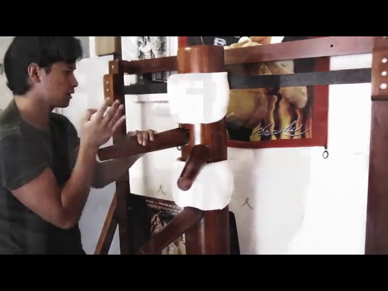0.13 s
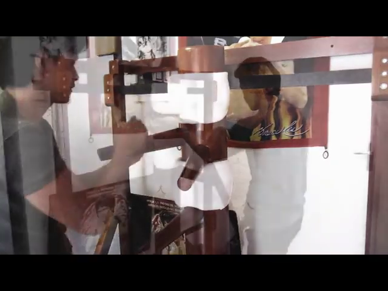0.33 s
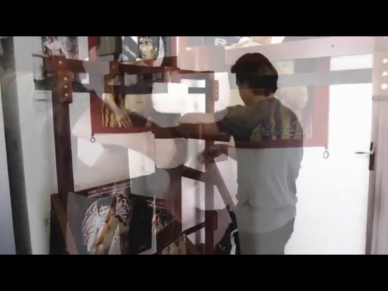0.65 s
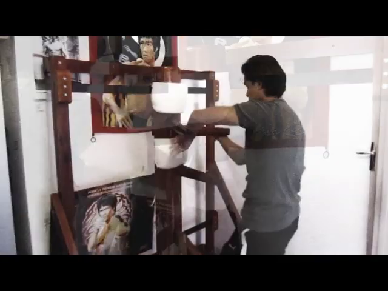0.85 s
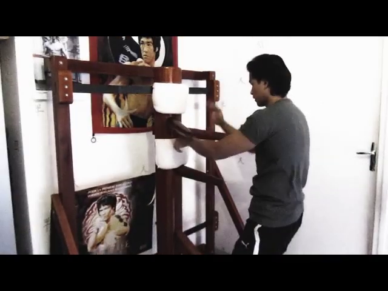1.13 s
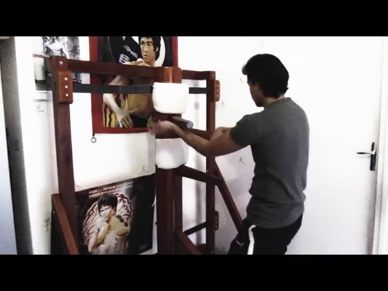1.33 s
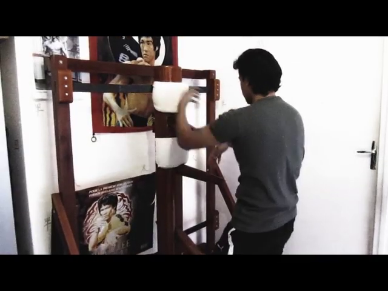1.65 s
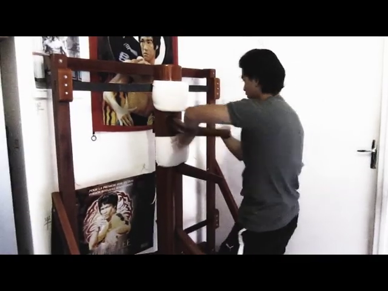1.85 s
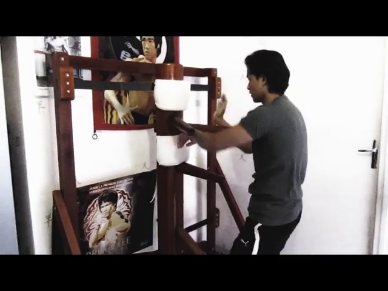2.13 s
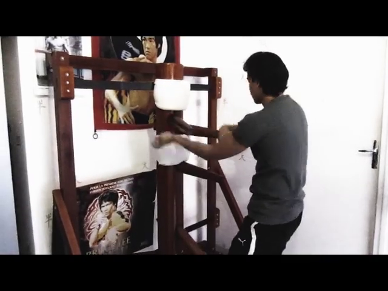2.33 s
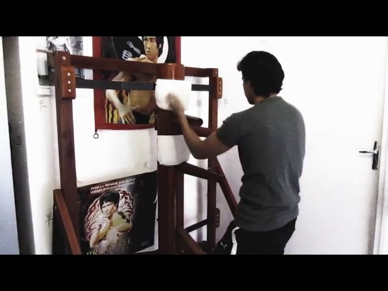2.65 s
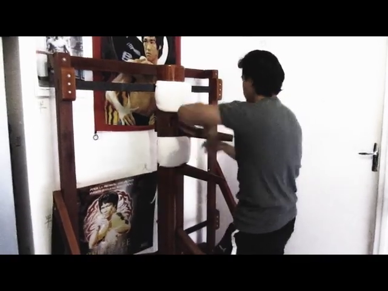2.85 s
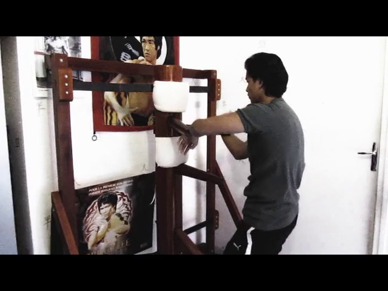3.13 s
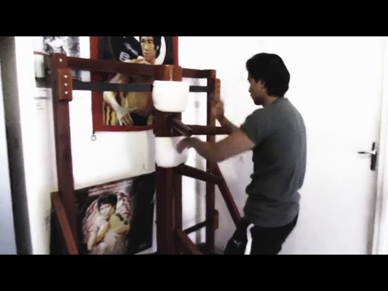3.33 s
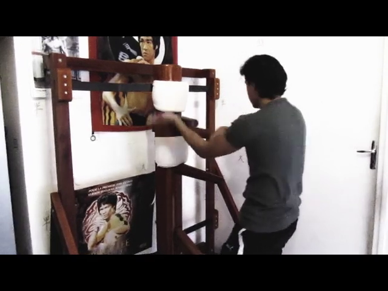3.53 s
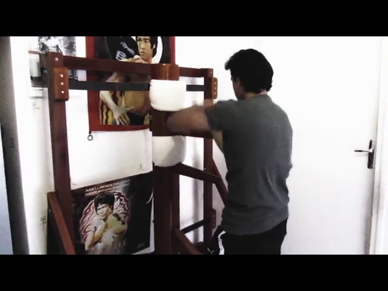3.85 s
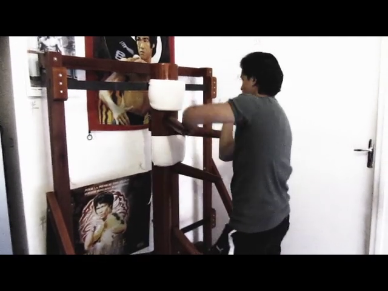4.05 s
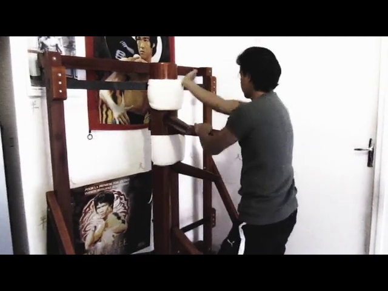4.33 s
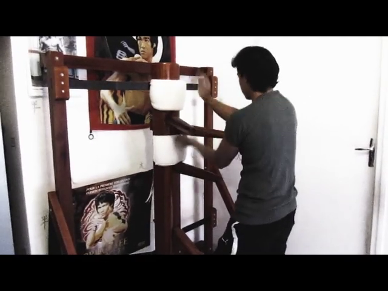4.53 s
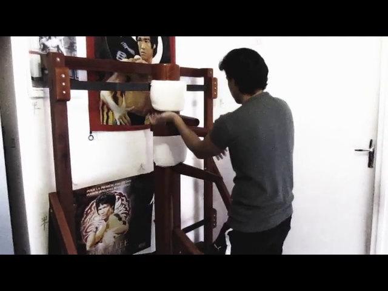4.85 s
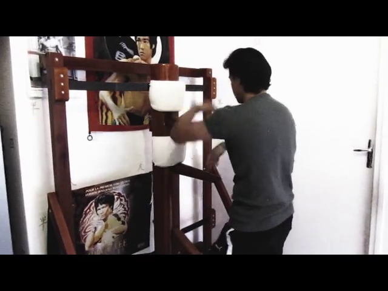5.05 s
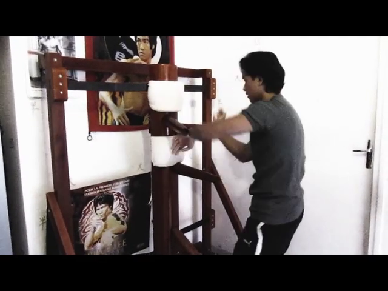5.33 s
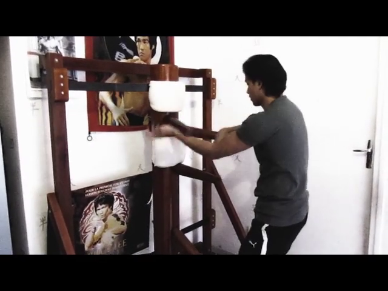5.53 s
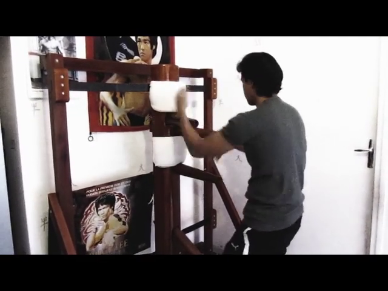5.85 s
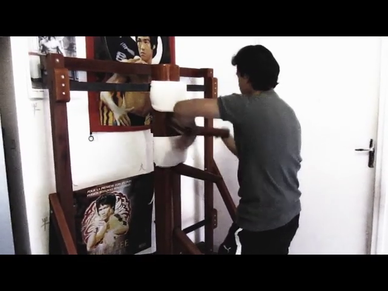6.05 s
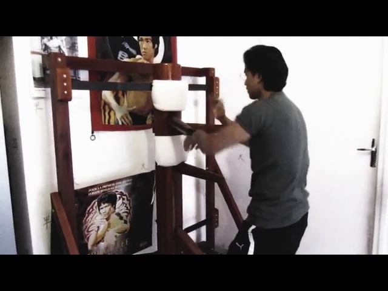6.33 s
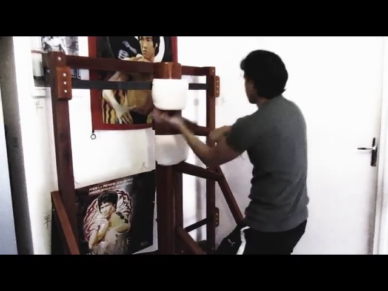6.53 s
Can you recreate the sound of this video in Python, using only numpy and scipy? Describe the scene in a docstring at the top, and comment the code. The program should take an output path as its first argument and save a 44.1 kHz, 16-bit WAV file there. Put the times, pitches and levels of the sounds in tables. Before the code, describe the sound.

Irregular bursts of hollow wooden knocks and dull thuds, with skin slaps and soft foot scuffs, in a small bare room.

```python
"""Irregular woody knocks with dull thuds, clacks and short rings sound in a small, bare room.
Someone drills on a wooden training dummy: each blow drives a loose arm against its socket, exciting
frame, trunk and arm as resonators. Skin slaps and slides on the wood, fingertips tick and feet shift.
Each contact is noise under a force envelope, coloured by a filter and followed by the room's decay.
Still air and a faint low drone, which swells twice, lie behind."""
import sys
import numpy as np
from scipy import signal
from scipy.fft import rfft, irfft
from scipy.io import wavfile

SR = 44100
rng = np.random.default_rng(int(sys.argv[2]) if len(sys.argv) > 2 else 0)


def put_to_file(sound):
    """Save the sound as 16-bit audio at rate SR, in the file named by the first command-line argument."""
    columns = np.atleast_2d(sound).T  # one column per channel
    safe = np.clip(columns, -1, 1)
    whole_steps = np.round(safe * 32767)
    wavfile.write(sys.argv[1], SR, whole_steps.astype(np.int16))


N = 295470
SIZE, LEAD = 32768, 1024  # samples in one short sound, and before its main contact
AGE = (np.arange(SIZE) - LEAD) / SR  # seconds since the main contact
FREQS = np.maximum(np.arange(SIZE // 2 + 1) * SR / SIZE, 1)  # Hz


def undb(db):
    """Level: an amplitude gain is ten to the power of decibels over twenty."""
    return 10 ** (np.asarray(db) / 20)


def curve(points, freqs=FREQS):
    """Spectral envelope: gain joined through (Hz, dB) points on a logarithmic frequency axis."""
    hz, db = np.transpose(points)
    return undb(np.interp(np.log(freqs), np.log(hz), db))


def bell(hz, octaves, height_db):
    """Formant: a Gaussian emphasis in octaves around one frequency."""
    distance = np.log2(FREQS / hz) / octaves
    return undb(height_db * np.exp(-.5 * distance ** 2))


def below(hz, order=8):
    """Low-pass: the steep Butterworth magnitude response."""
    return 1 / np.sqrt(1 + (FREQS / hz) ** (2 * order))


def shape(x, gain):
    """Minimum phase: folding the cepstrum makes a causal filter from a gain curve."""
    cepstrum = irfft(np.log(gain / gain.max() + 1e-4))
    cepstrum[1:SIZE // 2] *= 2
    cepstrum[SIZE // 2 + 1:] = 0
    response = np.exp(rfft(cepstrum))
    return gain.max() * irfft(rfft(x) * response)


def voiced(x, parts):
    """Energy summation of (gain, dB) parts; each level is that part's energy spread over 50 ms."""
    power = np.mean(np.abs(rfft(x)) ** 2, axis=0) * 2 / SIZE / (SR / 20)
    total = 0
    for gain, db in parts:
        total = total + (gain * undb(db)) ** 2 / (power @ gain ** 2)
    return shape(x, np.sqrt(total))


def add(out, s, x):
    """Superposition: a short sound joins the mix with its main contact at time s."""
    start = int(s * SR) - LEAD
    first, last = max(start, 0), min(start + SIZE, N)
    out[:, first:last] += x[:, first - start:last - start]


# Reverberation of the room, band by band. Each row: band centre in Hz, decay time by 60 dB in
# seconds, side level relative to mid in dB.
ROOM_BANDS = [(60, 0.68, 2.5), (154, 0.91, -10.5), (406, 0.6, -14.5), (1010, 0.49, -17), (2060, 0.46, -12),
              (4300, 0.42, -7.5), (8440, 0.4, -4.5), (13200, 0.36, 9.5)]


def diffuse_field():
    """Diffuse field: band noise at two microphones, least alike in the treble and then the deep bass."""
    hz, _, side_db = np.transpose(ROOM_BANDS)
    noise = rfft(rng.standard_normal((2, N)))
    octave = np.log2(np.linspace(1, SR / 2, N // 2 + 1))
    field = []
    for row, side_gain in zip(np.eye(len(hz)), undb(side_db)):
        # each band fades linearly in octaves into its neighbours
        mid, side = irfft(noise * np.interp(octave, np.log2(hz), row), N)
        field.append((mid + side_gain * np.outer([1, -1], side)) / np.hypot(1, side_gain))
    return np.array(field)


def in_room(force, direct_db, field):
    """Energy decay: noise follows the force, and its energy dies away exponentially in each band."""
    force = force / np.linalg.norm(force)
    start = rng.integers(N - SIZE)
    sound = undb(direct_db) * force * rng.standard_normal(SIZE)
    for band, (_, t60, _) in zip(field, ROOM_BANDS):
        keep = np.exp(-2 * np.log(1000) / (t60 * SR))  # energy kept per sample
        energy = signal.lfilter([1 - keep], [1, -keep], force ** 2)
        sound = sound + band[:, start:start + SIZE] * np.sqrt(energy)
    return sound


def reflected(x, gain=0.22, latest_s=.02, count=4):
    """Early reflection: nearby wall, door and frame return a few distinct delayed copies."""
    out = x
    for lag in rng.uniform(0.0989, 1, count) * latest_s:
        out = out + gain * np.roll(x, int(lag * SR), axis=1)
    return out


def contact(rise_s, fall_s, brush_db, brush_s=0.0053):
    """Contact force: a full push rises and decays, with a light brush just before and after its onset."""
    after = np.clip(AGE, 0, 40 * fall_s)
    push = (1 - np.exp(-after / rise_s)) * np.exp(-after / fall_s)
    return push + undb(brush_db) * np.exp(-np.abs(AGE) / brush_s)


# Spectrum of still air. Each row: frequency in Hz, relative density in dB per Hz.
AIR_COLOUR = [(25, -24), (60, -5.5), (90, -5), (220, 2.5), (450, -8.5), (1000, -8.5), (1600, -15),
              (2800, -18.5), (4000, -30), (6000, -24), (10000, -32.5), (13000, -58)]
AIR_DB = -56
# Swells of the low drone. Each row: start in seconds, end in seconds.
DRONE_SWELLS = [(.7, 1.7), (4.2, 5.8)]
DRONE_DB, DRONE_REST_DB, DRONE_FADE_S = -67.5, -80, 0.23  # swollen, resting, rise or fall time


def background(field):
    """Stationary noise: filtered room air, with a narrow-band drone near 58 Hz that swells and fades."""
    freqs, t = np.linspace(1, SR / 2, N // 2 + 1), np.arange(N) / SR
    reversed_field = field.sum(axis=0)[:, ::-1]  # runs apart from the reverberation
    air = irfft(rfft(reversed_field) * curve(AIR_COLOUR, freqs), N)
    drone_gain = curve([(46, -70), (56, -3), (58, 0), (60, -3), (72, -90)], freqs)
    drone = irfft(rfft(rng.standard_normal(N)) * drone_gain, N)
    swell = 0
    for start, end in DRONE_SWELLS:
        swell = swell + np.clip(np.minimum(t - start, end - t) / DRONE_FADE_S, 0, 1)
    drone_db = DRONE_REST_DB + (DRONE_DB - DRONE_REST_DB) * swell
    return undb(AIR_DB) * air / air.std() + undb(drone_db) * drone / drone.std()


def uneven(spread_db):
    """Stick-slip: friction strength jumps at random every 256 samples (6 ms)."""
    return undb(spread_db * np.repeat(rng.standard_normal(SIZE // 256), 256))


# Spectrum of a shoe sole on the floor. Each row: frequency in Hz, gain in dB.
SOLE_COLOUR = [(40, -34), (110, -4.5), (160, 9), (500, 6.5), (1000, 0.5), (2000, -15), (4000, -32.5),
               (9000, -47)]
# Feet and body shifting. Each row: start in seconds, level in dB, centre in Hz.
STEPS = [(.66, -35.5, 540), (1.059, -40, 433), (2.244, -43, 350), (2.499, -36.5, 540), (2.659, -42.5, 430),
         (3.409, -43, 517), (4.222, -43, 473), (4.352, -36.5, 570), (4.455, -38, 315), (5.407, -34, 350),
         (5.721, -37, 565), (6.295, -26.5, 400)]


def step(field, db, hz):
    """Stick-slip friction: a sole grips and slips unevenly in a soft, dull scuff."""
    force = uneven(4) * contact(rise_s=0.011, fall_s=0.03, brush_db=-8.5)
    burst = reflected(in_room(force, -2.4, field))
    colour = curve(SOLE_COLOUR) * bell(hz, octaves=1.0, height_db=5.0)
    colour = colour * bell(237, octaves=0.14, height_db=3.5)
    return voiced(burst, [(colour, db)])


# Spectrum of hands and sleeves rubbing. Each row: frequency in Hz, gain in dB.
CLOTH_COLOUR = [(100, -9.5), (300, -3), (1200, -7), (2000, -6), (3000, -8), (4100, -20.5), (6000, -15),
                (9000, -22), (13000, -35)]
# Hands and sleeves sliding. Each row: start in seconds, length in seconds, level in dB,
# extra treble in dB.
SLIDES = [(0.071, 0.082, -42, 2.5), (0.512, 0.091, -43, 2.5), (2.277, 0.088, -48, -9), (3.2, 0.026, -52, 3),
          (3.344, .2, -54.5, 5.5), (4.202, 0.063, -43, -12.5), (4.282, 0.085, -43, -15),
          (5.003, 0.074, -44, -15), (6.297, 0.037, -44.5, -9.5)]


def slide(field, length_s, db, treble_db, grain_db=3.0):
    """Sliding friction: uneven grains of noise last as long as the stroke."""
    progress = np.clip(AGE / length_s, 0, 1)
    force = uneven(grain_db) * (progress * (1 - progress)) ** 0.36
    burst = in_room(force, -5.0, field)
    colour = curve(CLOTH_COLOUR) * curve([(1000, 0.0094), (5000, treble_db)])
    energy_db = db + 10 * np.log10(length_s * 20)  # a longer stroke carries more energy
    return voiced(burst, [(colour, energy_db)])


# Spectrum of a fingertip click. Each row: frequency in Hz, gain in dB.
TICK_COLOUR = [(1500, -4), (3000, -1), (4200, -5), (7000, -6), (10000, -5), (13000, -15)]
# Fingertips clicking on the wood. Each row: start in seconds, level in dB, ring in Hz.
TICKS = [(1.115, -61, 7350), (2.254, -47.5, 7250), (3.12, -64.5, 6500), (4.206, -59, 6500),
         (4.571, -66, 5100), (4.884, -58, 6900)]
TICK_S, TICK_OCTAVES, TICK_RING_DB, TICK_DIRECT_DB = 0.0033, 0.1, 12.5, -2.5


def tick(field, db, hz):
    """Impulsive excitation: a tiny hard contact has one narrow, high resonance."""
    burst = in_room(contact(rise_s=.0003, fall_s=TICK_S, brush_db=-36), TICK_DIRECT_DB, field)
    return voiced(burst, [(curve(TICK_COLOUR) * bell(hz, TICK_OCTAVES, TICK_RING_DB), db)])


# Spectrum of skin on varnished wood. Each row: frequency in Hz, gain in dB.
SKIN_COLOUR = [(1500, 1.5), (3000, 7), (4100, -10), (5200, -5.5), (7000, -9.5), (10000, -13), (13000, -25)]
# Skin slapping the wood. Each row: start in seconds, level in dB, snap (extra top treble) in dB.
SLAPS = [(0.597, -48.5, -9), (0.764, -39.5, -35), (1.247, -38, -1.5), (1.318, -45, 4), (1.601, -51.5, -19),
         (1.829, -45, -8), (2.364, -37, 6), (2.727, -49.5, -10), (2.89, -43.5, 4), (2.955, -48, -6),
         (3.472, -33, 3), (3.88, -37.5, -3), (4.681, -33, 4.5), (5.083, -40.5, -7), (5.188, -44.5, 3.5),
         (5.465, -39.5, 11.5), (5.48, -32.5, -7), (5.553, -36.5, 5.5), (5.985, -44.5, -7),
         (6.422, -33.5, -4), (6.526, -40, 4.5)]
SLAP_HZ, SLAP_HZ_PER_DB = 5920, 36.5  # centre at zero snap, and its rise with snap


def slap(field, db, snap_db):
    """Impact: skin meets varnished wood in a short bright burst, brighter when the palm lands flat."""
    force = contact(rise_s=0.0011, fall_s=0.0075, brush_db=-19.5)
    burst = reflected(in_room(force, -1.9, field))
    centre = bell(SLAP_HZ + SLAP_HZ_PER_DB * snap_db, octaves=0.78, height_db=17)
    snap = curve([(7000, 0.031), (12500, snap_db)])
    return voiced(burst, [(curve(SKIN_COLOUR) * centre * snap, db)])


# Broad crack of wood on wood. Each row: frequency in Hz, gain in dB.
CRACK_COLOUR = [(40, -67), (90, -29), (160, -12), (500, 5), (1050, -1), (1350, -7), (1600, -5.5), (2200, 0),
                (2700, -4), (3400, -15), (4200, -53), (8000, -64)]
# Resonances of the dummy. Each row: frequency in Hz, width in Hz, typical peak in dB.
DUMMY_MODES = [(158.2, 17.4, -4), (225, 6.8, -1.5), (341, 8.1, -7.5), (544, 45, 3.5), (649.6, 41, 5),
               (698, 46, 4), (790, 110, 2.5), (857, 29, 2.5), (905, 38, 0.5), (981, 86, 2), (1040, 92, 4.5),
               (1253, 67, 5.5), (1319, 11, 7.5), (2000, 15.5, -2.5), (2086, 7.8, -8), (2170, 29, 4),
               (2255, 3.3, 0), (2286, 10, -5.5), (3300, 35, -5), (3450, 39, -4.5)]


def wood(scatter_db=0.83):
    """Modal response: fixed resonances on a broad crack vary in strength with the landing point."""
    power = curve(CRACK_COLOUR) ** 2
    for (hz, width, db), strength in zip(DUMMY_MODES, rng.standard_normal(len(DUMMY_MODES))):
        detuning = (FREQS ** 2 - hz ** 2) / (FREQS * width)
        power = power + undb(db + scatter_db * strength) ** 2 / (1 + detuning ** 2)
    return np.sqrt(power)


NOTE_OCTAVES, NOTE_DB = 0.043, 3.5  # a narrow woody note at the clack centre


def knock(field, force, db, clack_hz, focus_db, arm_hz, ring_db, thud_db, direct_db):
    """Band division: one push excites frame (low), trunk (middle) and arm (high) as separate shares."""
    burst = reflected(in_room(force, direct_db, field))
    body, frame, trunk = wood(), below(446), below(1830)
    thud = body * frame
    clack = body * trunk * np.sqrt(1 - frame ** 2)
    clack = clack * bell(clack_hz, octaves=0.33, height_db=focus_db)
    clack = clack * bell(clack_hz, octaves=NOTE_OCTAVES, height_db=NOTE_DB)
    ring = body * np.sqrt(1 - trunk ** 2) * bell(arm_hz, octaves=0.14, height_db=14.5)
    return voiced(burst, [(thud, db + thud_db), (clack, db), (ring, db + ring_db)])


LOW_ARM_HZ, HIGH_ARM_HZ = 1960, 2135  # where each of the two loose arms rings
# A forearm grazing the wood just before a blow. Each row: start in seconds, strength in dB.
GRAZES = [(1.581, -44), (3.455, -27), (3.821, -37.5), (4.672, -27), (5.169, -32.5)]
GRAZE_HZ, GRAZE_FOCUS_DB, GRAZE_S, GRAZE_DIRECT_DB = 930, 2.5, 0.021, -11
GRAZE_RATTLE_DB, GRAZE_THUD_DB = -41, -4.5  # level of the arm's rattle; frame thud re strength


def graze(field, db):
    """Slack take-up: a soft, drawn-out touch rattles the arm equally however light it is."""
    force = contact(rise_s=0.00082, fall_s=GRAZE_S, brush_db=-6)
    ring_db = GRAZE_RATTLE_DB - db  # cancels the strength
    return knock(field, force, db, GRAZE_HZ, GRAZE_FOCUS_DB, LOW_ARM_HZ, ring_db,
                 GRAZE_THUD_DB, GRAZE_DIRECT_DB)


# Blows on the dummy. Each row: start in seconds, strength in dB, clack centre in Hz, ring of the
# struck arm in Hz, arm ring relative to strength in dB, frame thud relative to strength in dB,
# chatter decay in seconds, direct sound in dB.
BLOWS = [(.063, -40, 1270, LOW_ARM_HZ, -7.5, -5.5, 0.0083, -0.5),
         (.599, -25.5, 990, LOW_ARM_HZ, -12, -6.5, 0.019, 3.5),
         (.739, -18.5, 754, LOW_ARM_HZ, -15, -11, 0.0074, -4),
         (.762, -22.5, 1165, LOW_ARM_HZ, -8.5, -11, 0.0048, -5),
         (.918, -33.5, 845, LOW_ARM_HZ, -9, -2, 0.0053, -3),
         (1.252, -22.5, 845, LOW_ARM_HZ, -17.5, -10.5, 0.0071, -1),
         (1.278, -26.5, 780, LOW_ARM_HZ, -21, -9.5, 0.0046, 1.5),
         (1.604, -23, 1114, LOW_ARM_HZ, -13.5, -12.5, 0.0068, -2),
         (1.826, -17, 925, LOW_ARM_HZ, -14.5, -10.5, 0.004, -3.5),
         (1.852, -19, 766, LOW_ARM_HZ, -13, -7, 0.008, -17),
         (2.366, -16, 920, HIGH_ARM_HZ, -7, -13, 0.017, -1),
         (2.724, -20.5, 1015, LOW_ARM_HZ, -14.5, -14.5, 0.011, -3),
         (2.888, -17.5, 840, HIGH_ARM_HZ, -14.5, -10, 0.011, -9),
         (2.955, -23, 840, LOW_ARM_HZ, -10.5, -7, .008, -4.5),
         (3.474, -15.5, 1020, HIGH_ARM_HZ, -6.5, -15, .005, -6.5),
         (3.497, -16.5, 1060, HIGH_ARM_HZ, -13, -23, 0.02, 4),
         (3.886, -13, 1030, LOW_ARM_HZ, -15.5, -8.5, 0.0022, -1.5),
         (4.684, -23, 733, LOW_ARM_HZ, -23, -4, 0.0064, -2.5),
         (5.057, -25.5, 1046, LOW_ARM_HZ, -10, -12.5, 0.017, -2),
         (5.186, -15, 826, LOW_ARM_HZ, -20.5, -10.5, 0.0064, -6),
         (5.481, -18, 930, HIGH_ARM_HZ, -12, -10, 0.029, -1.5),
         (5.508, -19.5, 846, HIGH_ARM_HZ, -19, -15.5, 0.018, -2.5),
         (5.555, -23.5, 920, LOW_ARM_HZ, -10, -21.5, .006, 0.5),
         (5.983, -18, 1048, LOW_ARM_HZ, -5.5, -17.5, 0.0041, 0),
         (6.015, -17, 885, LOW_ARM_HZ, -9.5, -13.5, 0.074, -11),
         (6.421, -15, 840, HIGH_ARM_HZ, -11, -10.5, 0.018, -1),
         (6.528, -21, 997, HIGH_ARM_HZ, -9, -7, 0.022, -3.5)]
FIRM_DB = -18.5  # strength of an ordinary firm blow
FOCUS_DB, FOCUS_DB_PER_DB = 6, 0.02  # harder blows gather more closely around the clack centre
# glancing blows, which chatter longer, brush more
BRUSH_DB, BRUSH_CHATTER_S, BRUSH_DB_PER_OCTAVE = -13.5, 0.01, 8.5


def blow(field, db, clack_hz, arm_hz, ring_db, thud_db, chatter_s, direct_db):
    """Impact excitation: the struck arm chatters against its socket and drives the whole dummy."""
    brush_db = BRUSH_DB + BRUSH_DB_PER_OCTAVE * np.log2(chatter_s / BRUSH_CHATTER_S)
    focus_db = FOCUS_DB + FOCUS_DB_PER_DB * (db - FIRM_DB)
    force = contact(0.0013, chatter_s, brush_db)
    return knock(field, force, db, clack_hz, focus_db, arm_hz, ring_db, thud_db, direct_db)


LEFT_DB = 1.2  # left channel over right


def scene():
    """Superposition: background, footwork and strokes add up, slightly left of centre."""
    field = diffuse_field()
    out = background(field)
    sources = [(step, STEPS), (slide, SLIDES), (tick, TICKS),
               (slap, SLAPS), (graze, GRAZES), (blow, BLOWS)]
    for source, table in sources:
        for s, *stroke in table:
            add(out, s, source(field, *stroke))
    return out * undb(np.array([[LEFT_DB], [-LEFT_DB]]) / 2)


TOP_HZ = 13500


def record(dry):
    """Band limiting: peaks clip at full scale, then a steep elliptic low-pass cuts the top."""
    low_pass = signal.ellip(10, .2, 70, TOP_HZ, fs=SR, output="sos")
    return signal.sosfilt(low_pass, np.clip(dry, -1, 1))


dry = scene()
out = record(dry)
put_to_file(out)
```